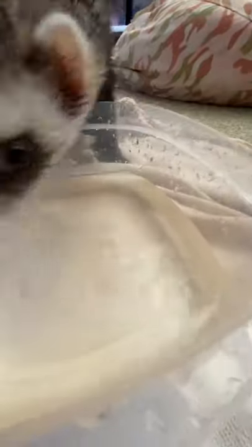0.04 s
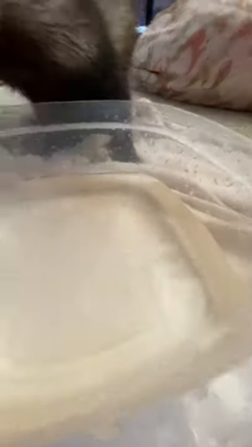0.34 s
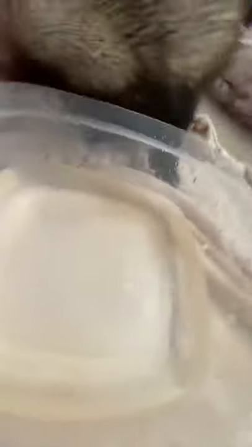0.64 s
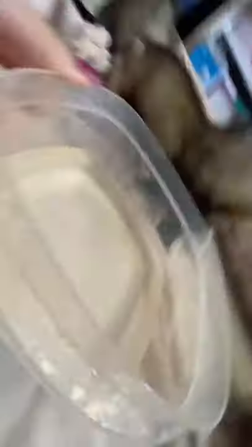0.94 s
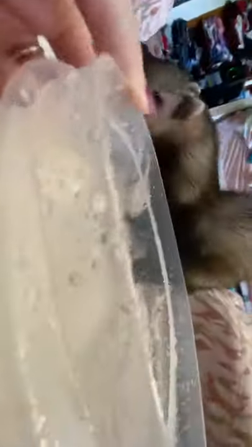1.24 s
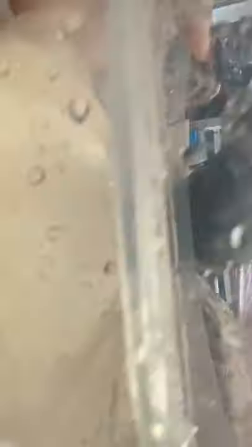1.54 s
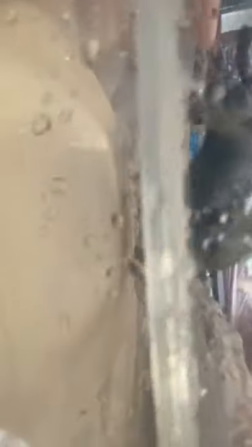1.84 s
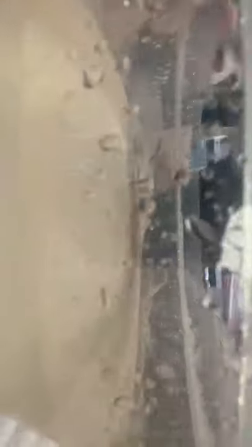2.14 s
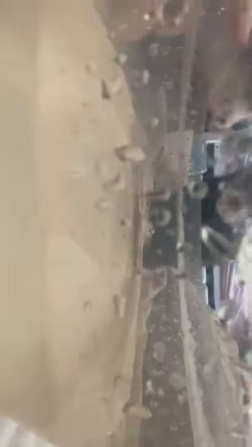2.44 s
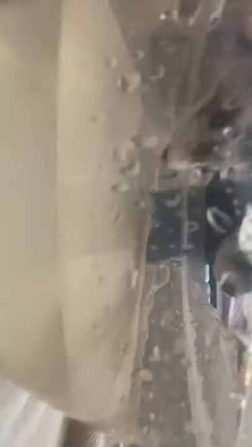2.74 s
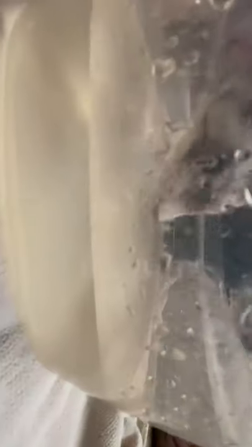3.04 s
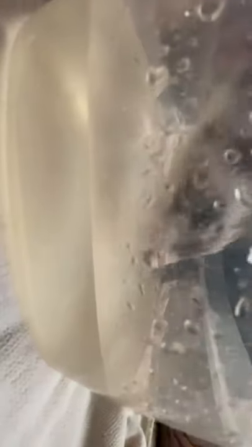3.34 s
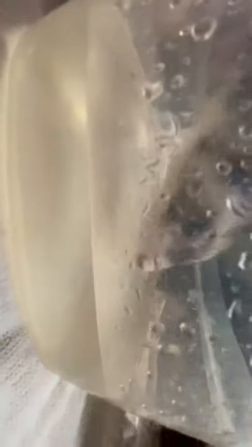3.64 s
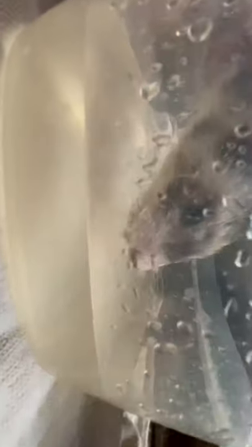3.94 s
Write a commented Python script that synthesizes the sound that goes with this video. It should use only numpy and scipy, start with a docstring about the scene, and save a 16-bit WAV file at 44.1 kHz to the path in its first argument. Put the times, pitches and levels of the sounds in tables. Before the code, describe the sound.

Soft, irregular licking clicks and little water plops come from a small animal at a plastic container, heard up close indoors. Light plastic creaks, rubbing and one dull handling bump follow, over a low fan hum that swells late.

```python
"""Wet ticks and small plops, close to the microphone: a ferret licks at a thin plastic tub of water.
Films of water break, bubbles ring, the wall creaks and snaps, and hand, cloth and fur rub on it softly.
A hand then tilts the tub towards the animal. Behind it all, in the room, a fan rumbles and hums.
Near the end the rumble grows, turns hollow between the ears and settles in the centre."""
import sys
import numpy as np
from scipy import signal
from scipy.fft import rfft, irfft
from scipy.io import wavfile
from scipy.ndimage import map_coordinates

SR = 44100
rng = np.random.default_rng(int(sys.argv[2]) if len(sys.argv) > 2 else 0)


def persist_wave(psi):
    """Save psi, clipped to +-1, as 16-bit WAV."""
    counts = np.round(np.clip(psi, -1, 1) * 32767).astype(np.int16)
    wavfile.write(sys.argv[1], SR, np.atleast_2d(counts).T)


N = 176400

# wet ticks of tongue, drops and plastic: t/s, relative level/dB, resonance f/Hz, left-right/dB
TICKS = [(.0086,-43,9800,1),(.0462,-56,9600,0),(0.0525,-48.5,9800,2),(0.0564,-52,5660,-5),(.093,-63,5040,-28),(0.107,-50.5,8550,-4),(0.1328,-45,6200,-2),(.162,-57,5660,-2),(0.1694,-44,3660,-2),(0.178,-50,5640,-4),(0.183,-50,6700,-4),(0.253,-49,10900,6),(0.279,-48.5,5500,-8),(0.2835,-42,10100,1),(0.2881,-46,5600,-5),(0.532,-56,5200,-4),(0.5474,-57.5,5100,0),(.643,-55,6300,1),(0.902,-57,6100,0),(1.3734,-53.5,8700,.5),(2.1978,-57.5,4700,-5),(2.417,-53.5,2840,-10),(2.5154,-56,6750,-3),(2.624,-50.5,3440,-1),(2.826,-56,6550,-10),(3.157,-57.5,4500,-3),(3.176,-54,5100,-2)]
# bubbles in the water: t/s, level/dB, f/Hz, decay/s
PLOPS = [(.048,-45.5,1470,.002),(.063,-38,790,0.0017),(0.58,-46,770,0.00084),(3.804,-49,910,0.0033),(3.8726,-36,774,0.0026)]
# modes of the creaking wall: f/Hz, relative level/dB, decay/s
WALL_MODES = [(1490,-21,0.002),(1670,1,0.0028),(2120,-0.5,.0009),(2610,-6.5,0.0024),(3100,-6,0.00068),(3760,-11,0.0009)]
# snaps of the tub wall: t/s, level/dB, decay/s, tilt/(dB per octave)
SNAPS = [(0.6381,-48.5,0.00089,1),(0.7154,-43,0.003,-6),(1.304,-49.5,0.0076,-2.5),(1.3104,-40,0.0026,-0.5),(2.4343,-39,0.00066,12),(3.1465,-48,0.002,-6.5)]
# spectrum of a snap before its tilt: f/Hz, level/dB
SNAP_SPECTRUM = [(200,-22),(600,3),(1000,-22.5),(1500,3.5),(2200,1),(4000,-14),(7000,1),(9000,-4.5),(15000,-17)]
# handling bumps: t/s, level/dB, f/Hz, decay/s, left gain, right gain
BUMPS = [(1.326,-28,87,0.022,0.16,1)]
# scrapes on the plastic: t/s, length/s, level/dB, resonance f/Hz
SCRAPES = [(0.303,0.026,-65.5,5240),(0.636,0.015,-65.5,5400),(.3,1.12,-76.5,1680),(0.794,0.27,-84.5,5240),(.38,0.16,-70.5,5200),(2.429,0.041,-68,3000),(2.612,0.033,-66,3300),(2.637,0.11,-77,6140),(2.92,0.063,-75,5660),(3.388,0.097,-66.5,5300),(3.73,0.045,-69,5500),(3.917,0.029,-71.5,3580)]
# spectrum of the rubbing: f/Hz, level/dB
RUB_SPECTRUM = [(400,1.5),(1500,10),(2500,10),(3800,4.5),(5500,4),(7500,0.5),(10000,-4.5),(12000,-25),(15000,-43)]
# strength of the rubbing: t/s, level/dB
RUB_LEVEL = [(0,-68.5),(.1,-62),(.23,-73),(.32,-68.5),(.45,-63),(.53,-72),(.77,-78),(.89,-69),(.98,-78),(1.05,-74.5),(1.14,-83.5),(1.3,-73),(1.45,-81.5),(2,-78),(2.38,-80),(2.45,-66.5),(2.56,-75.5),(2.72,-70),(2.9,-71.5),(3.12,-71),(3.18,-64),(3.26,-71),(3.35,-73),(3.44,-61),(3.53,-66),(3.68,-72),(3.77,-64.5),(3.88,-74),(4,-60.5)]
# width of the rubbing: t/s, left-right correlation
RUB_LIKENESS = [(0,-0.96),(1.1,1),(1.5,-0.4),(2.7,0.16),(3.3,-0.78),(4,-0.43)]
# spectrum of a thin, high hiss: f/Hz, level/dB
HISS_SPECTRUM = [(3000,-56),(5200,9.5),(7700,-6),(8150,21),(9300,15.5),(10500,7.5),(12000,-20),(15000,-33)]
# its spurts near the end: t/s, level/dB
HISS_LEVEL = [(2.4,-116),(3.2,-93),(3.33,-76.5),(3.42,-62),(3.52,-83),(3.63,-67.5),(3.69,-86),(3.79,-71.5),(3.89,-88)]
# spectrum of the fan's rumble: f/Hz, level/dB
FAN_SPECTRUM = [(20,-26),(36,-16.5),(50,-14.5),(63,-1),(75,2),(86,-4.5),(103,3),(128,1),(147,-11),(170,0.5),(188,-12.5),(204,-2.5),(222,-8.5),(240,-6.5),(268,-3.5),(290,-13),(430,-13),(490,-16),(540,-28),(760,-28),(1050,-39),(1550,-33.5),(1900,-36.5),(2800,-42.5),(4000,-54),(7000,-100),(10000,-67.5),(15000,-75)]
# strength of the rumble: t/s, level/dB
FAN_LEVEL = [(0,-45),(.3,-44.5),(.6,-46.5),(1.1,-46),(3.1,-45),(3.43,-44.5),(3.55,-40.5),(4,-38)]
# the fan's lean to the left: f/Hz, left-right/dB
FAN_BALANCE = [(60,1.3),(130,1.8),(250,2.6),(400,4.2),(700,1.8),(1300,0),(3000,-2)]
# tones of the mains hum: f/Hz, level/dB
HUM_TONES = [(120,-55),(241,-58.5),(300,-64.5),(479.3,-66)]
# spectrum of a low rush: f/Hz, level/dB
RUSH_SPECTRUM = [(200,-17.5),(450,9),(750,8),(1100,-4),(1800,-33),(4000,-58.5)]
# its swell as the tub tilts: t/s, level/dB
RUSH_LEVEL = [(0,-63.5),(.9,-76.5),(1.3,-70.5),(2.2,-62),(2.8,-58),(3.1,-61.5),(3.45,-58),(3.75,-54.5),(4,-56.5)]
# edge between the fan's bass and upper band: t/s, f/Hz, correlation above it (limited to -1 in use)
BASS_EDGE = [(0,473,0.3),(.6,473,0.41),(1.3,508,-0.25),(2.601,514,-0.49),(3.1,517,-0.54),(3.26,420,-0.94),(3.38,261,-0.99),(3.54,350,-0.92),(3.62,670,-1.12),(3.75,1050,-1.28)]
# width of the fan below that edge: t/s, left-right correlation
BASS_LIKENESS = [(3.05,.9),(3.26,.4),(3.37,-.2),(3.43,-.95),(3.52,.6),(3.6,1)]
# spectrum of the room's diffuse air: f/Hz, level/dB
AIR_SPECTRUM = [(350,-24.5),(600,9.5),(1100,2.5),(1500,-3.5),(2000,-38)]
# lead of near sounds at the left microphone port: f/Hz, phase/rad
PORT_PHASE = [(1500,0.084),(5500,0.99),(8000,2.08),(10000,1.94),(13000,1.94)]

TICK_TOP_HZ, GRAINS_PER_S = 8950, 720
OPPOSED = np.array([[1], [-1]])  # left and right in opposite sign


def ticks():
    """Each breaking film of water rings one short resonance over a broad splash, then crackles briefly."""
    trim_db, full_splash_db, decay_s = -2.5, -43.5, .0014
    out, f = 0, freqs()
    splash = undb(-13) * f / np.hypot(f, 1200) / np.hypot(1, (f / TICK_TOP_HZ) ** 4)
    for start, db, hz, pan_db in TICKS:
        wetness = undb(min(db - full_splash_db, 0))  # weaker ticks splash less
        colour = np.hypot(resonance(hz, width=.3), splash * wetness)
        burst = unit(filtered(pair(0.91), colour))
        crackle = blow(start, attack=decay_s, decay=.007) * undb(-16 + 1.5 * grain(GRAINS_PER_S))
        envelope = np.hypot(blow(start, attack=.0005, decay=decay_s), crackle)
        out = out + burst * envelope * undb(db + trim_db) * pan(pan_db)
    return out


def plops():
    """Small, quickly damped bubbles ring and rise slightly in pitch."""
    out, rise_per_s = 0, 2.8
    for start, db, hz, decay in PLOPS:
        t = since(start)
        bubble = np.sin(2 * np.pi * hz * t * (1 + rise_per_s * t))
        out = out + undb(db) * blow(start, attack=.0008, decay=decay) * bubble
    return lowpass(out, hz=1350, order=6)


def creak():
    """A quick run of growing slips rings the tub wall, right of centre."""
    start_s, length_s, slips_per_s, growth_db = .0212, .0075, 640, 8
    slips = np.arange(0, length_s, 1 / slips_per_s)
    out = 0
    for slip, (jitter, scatter_db) in zip(slips, rng.standard_normal((len(slips), 2))):
        t = since(start_s + slip + 0.099 * jitter / slips_per_s)
        ring = sum(undb(db) * np.exp(-np.minimum(t / decay, 20)) * np.sin(2 * np.pi * hz * t)
                   for hz, db, decay in WALL_MODES)
        out = out + ring * undb(-53.5 + growth_db * slip / length_s + scatter_db)
    return lowpass(out, TICK_TOP_HZ, order=4) * pan(db=-6)


def snaps():
    """The thin wall buckles with a dry crack; the longer ones build more slowly."""
    out, colour, octaves = 0, shape(SNAP_SPECTRUM), np.log2(freqs())
    for start, db, decay, tilt in SNAPS:
        crack = noise(likeness=-0.68, db=colour + tilt * octaves)
        out = out + crack * blow(start, decay / 2, decay) * undb(db)
    return out


def bumps():
    """Handling gives a dull thud, mostly in the right channel."""
    out = 0
    for start, db, hz, decay, left, right in BUMPS:
        thud = -np.sin(2 * np.pi * hz * since(start)) * blow(start, attack=0.003, decay=decay)
        out = out + undb(db) * thud * np.array([[left], [right]])
    return out


def scrapes():
    """Uneven slips swell and fade in one resonance of the plastic."""
    out = 0
    for start, length, db, hz in SCRAPES:
        slips = pair(0.83) * undb(1.5 * grain(per_s=500))
        ring = unit(filtered(slips, resonance(hz, width=0.17)))
        swell = np.sin(np.pi * np.minimum(since(start) / length, 1))
        out = out + ring * undb(db) * swell
    return out * pan(db=-3.8)


def rubbing():
    """Grainy friction of hand, cloth and fur on the tub; near the end a thin hiss on the left."""
    friction = pair(curve(RUB_LIKENESS)) * undb(2.5 * grain(GRAINS_PER_S))
    rub = unit(tint(friction, shape(RUB_SPECTRUM)))
    hiss = noise(likeness=1, db=shape(HISS_SPECTRUM)) * undb(curve(HISS_LEVEL))
    return wander(rub) * undb(curve(RUB_LEVEL)) * pan(db=-0.5) + hiss * pan(db=7)


def wander(x):
    """Resonances come and go as the contact shifts over the tub."""
    depth_db, patch_hz, patch_s = 3.5, 350, .035
    hz, t, spectra = signal.stft(x, SR, nperseg=1024)
    places = np.meshgrid(hz / patch_hz, t / patch_s, indexing="ij")
    patches = map_coordinates(rng.standard_normal((len(hz), len(t))), places, mode="mirror")
    return signal.istft(spectra * undb(depth_db * patches), SR)[1][:, :N]


def fan():
    """The fan rumbles in the room's low resonances, with mains hum and a rush above them."""
    centred_at_s, centring_s = 3.3, 0.095
    rumble = noise(likeness=0, db=shape(FAN_SPECTRUM)) * undb(curve(FAN_LEVEL))
    rush = noise(likeness=0, db=shape(RUSH_SPECTRUM)) * undb(curve(RUSH_LEVEL))
    hum = sum(np.sqrt(2) * undb(db) * np.sin(2 * np.pi * (hz * since(0) + rng.random((2, 1))))
              for hz, db in HUM_TONES)
    centred = spread(rumble + rush + hum)
    leaning = tint(centred, OPPOSED * shape(FAN_BALANCE) / 2)
    lean = np.clip((centred_at_s - since(0)) / centring_s, 0, 1)
    return lean * leaning + (1 - lean) * centred


def spread(x):
    """Set the stereo width below and above a moving edge; opposed channels sound hollow."""
    hz, t, spectra = signal.stft(x, SR, nperseg=1024)
    when, edge, above = np.array(BASS_EDGE).T
    edge, above = np.interp(t, when, edge), np.interp(t, when, above)
    below = np.interp(t, *np.array(BASS_LIKENESS).T)
    bass = 1 / (1 + (hz[:, None] / edge) ** 20)
    likeness = np.clip(bass * below + (1 - bass) * above, -1, 1)
    shares = np.sqrt(np.array([1 + likeness, 1 - likeness]) / 2)
    mid, side = signal.istft(spectra * shares, SR)[1][:, :N]
    return np.array([mid + side, mid - side])


def air():
    """A wide, steady midrange rush, and the wide top of the rubbing."""
    steady = unit(tint(rng.standard_normal(N), shape(AIR_SPECTRUM))) * undb(-67.5)
    sheen = unit(filtered(rng.standard_normal(N), resonance(hz=14200, width=0.092)))
    rub_db = curve(RUB_LEVEL)
    sheen_db = rub_db - 16.5 + np.minimum(rub_db + 79.5, 0)  # the faintest rubbing is duller
    return (steady + sheen * undb(sheen_db)) * OPPOSED


def room(close):
    """The room answers the near sounds with a short, dull tail."""
    tail = lowpass(pair(0), hz=6500, order=4) * blow(0.00098, attack=0.00093, decay=0.025)
    return signal.fftconvolve(close, unit(tail) / np.sqrt(N), axes=1)[:, :N]


def ports(x):
    """Near sounds reach the left microphone port first."""
    return filtered(x, np.exp(.5j * shape(PORT_PHASE) * OPPOSED))


def undb(db):
    """Decibels to gain."""
    return 10 ** (np.asarray(db) / 20)


def unit(x):
    """Scale to rms 1."""
    return x / np.sqrt(np.mean(x ** 2))


def pan(db):
    """Left and right gains for a left-right difference."""
    return undb(OPPOSED * db / 2)


def since(start):
    """Seconds since a start, zero before it."""
    return np.maximum(np.arange(N) / SR - start, 0)


def curve(rows):
    """A table's points joined by straight lines in time."""
    return np.interp(since(0), *np.array(rows).T)


def blow(start, attack, decay):
    """A linear attack and an exponential decay, times in seconds."""
    t = since(start)
    return np.minimum(t / attack, 1) * np.exp(-np.clip((t - attack) / decay, 0, 40))


def freqs():
    """The frequency axis, from 1 Hz."""
    return np.maximum(np.arange(N // 2 + 1) * SR / N, 1)


def shape(points):
    """A table's points joined over log frequency."""
    hz, values = np.array(points).T
    return np.interp(np.log(freqs()), np.log(hz), values)


def resonance(hz, width):
    """The gain of a peak at hz; width is relative to hz."""
    return 1 / (1 + ((freqs() / hz - hz / freqs()) / width) ** 2)


def filtered(x, gain):
    """Apply a gain at each frequency."""
    return irfft(rfft(x) * gain, N)


def tint(x, db):
    """Filter by a dB curve."""
    return filtered(x, undb(db))


def lowpass(x, hz, order):
    """Roll off the treble."""
    return filtered(x, 1 / np.hypot(1, (freqs() / hz) ** order))


def pair(likeness):
    """Left and right white noise with a given correlation."""
    mid, side = rng.standard_normal((2, N))
    return np.sqrt((1 + likeness) / 2) * mid + np.sqrt((1 - likeness) / 2) * side * OPPOSED


def noise(likeness, db):
    """Stereo noise coloured by a dB curve, at rms 1."""
    return unit(tint(pair(likeness), db))


def grain(per_s):
    """Random flicker at a given rate."""
    return np.interp(since(0) * per_s, np.arange(N), rng.standard_normal(N))


def scene():
    """The tub close to the microphone, the room and its fan behind."""
    close = ports(ticks() + scrapes()) + plops() + creak() + snaps()
    return close + undb(-14) * room(close) + bumps() + ports(rubbing()) + fan() + air()


def record(dry):
    """The recorder cuts the top above 15.8 kHz."""
    return signal.sosfilt(signal.ellip(8, .2, 70, 15800, fs=SR, output="sos"), dry)


dry = scene()
out = record(dry)
persist_wave(out)
```